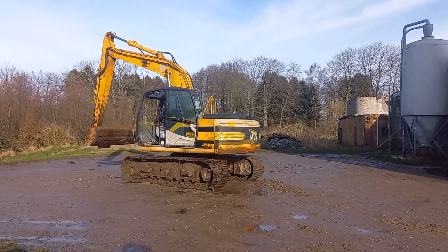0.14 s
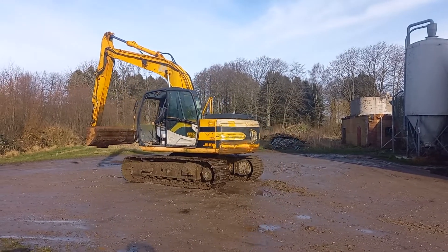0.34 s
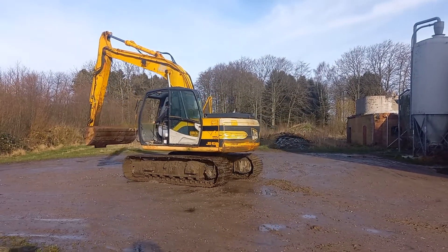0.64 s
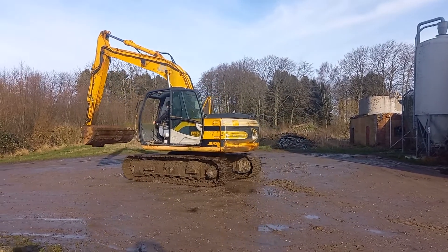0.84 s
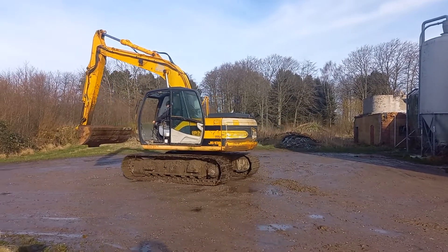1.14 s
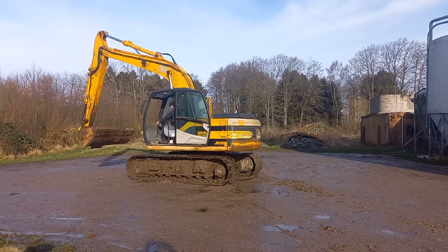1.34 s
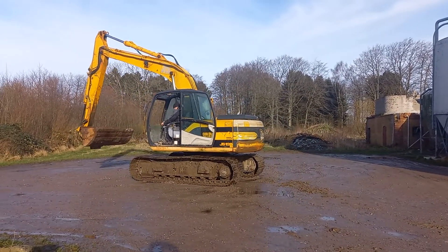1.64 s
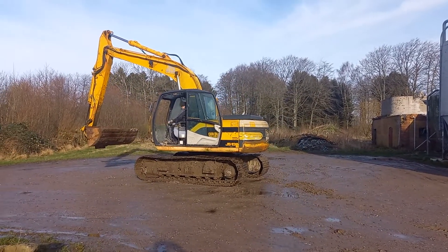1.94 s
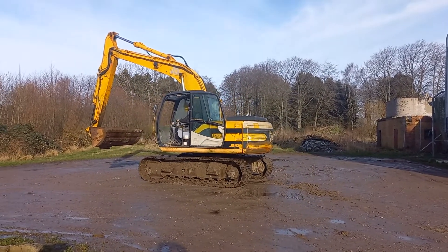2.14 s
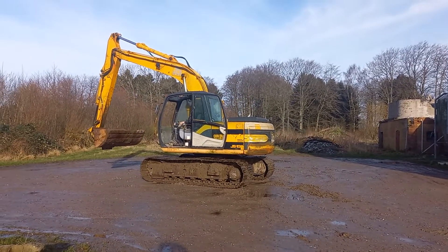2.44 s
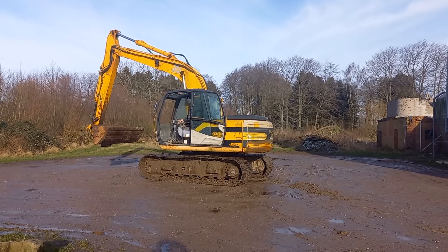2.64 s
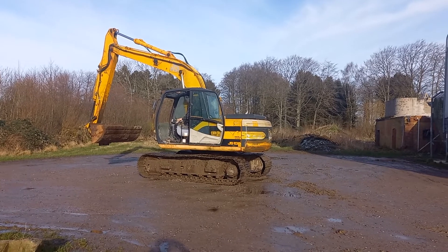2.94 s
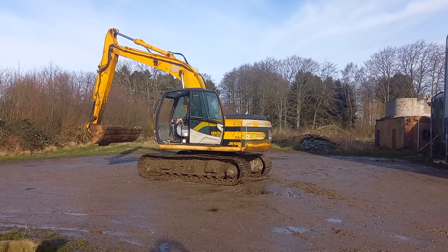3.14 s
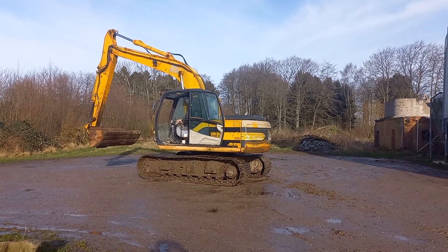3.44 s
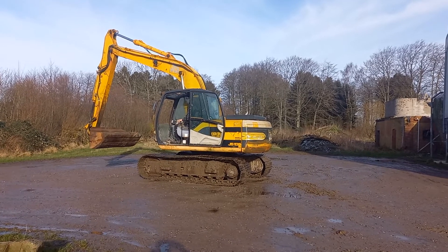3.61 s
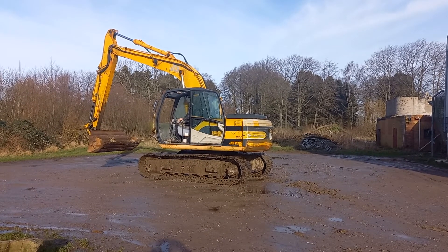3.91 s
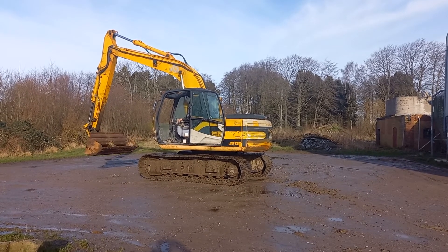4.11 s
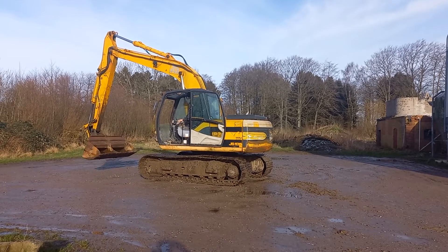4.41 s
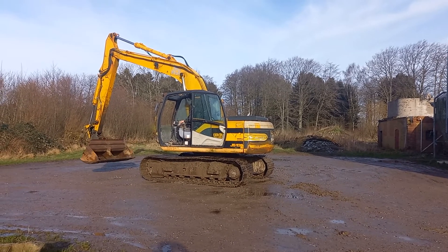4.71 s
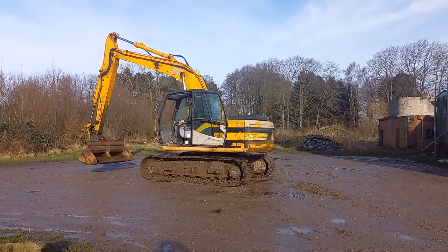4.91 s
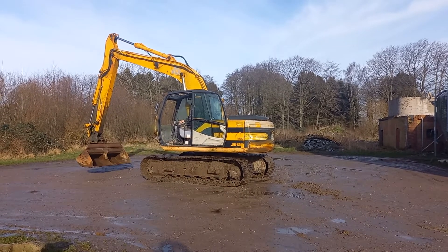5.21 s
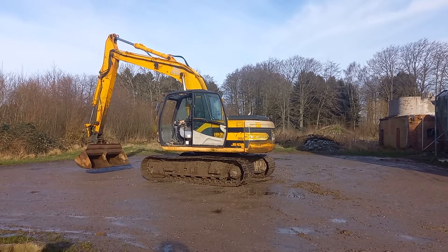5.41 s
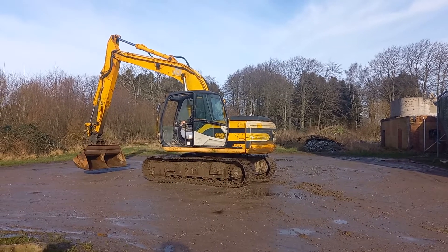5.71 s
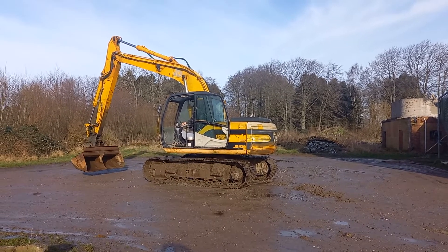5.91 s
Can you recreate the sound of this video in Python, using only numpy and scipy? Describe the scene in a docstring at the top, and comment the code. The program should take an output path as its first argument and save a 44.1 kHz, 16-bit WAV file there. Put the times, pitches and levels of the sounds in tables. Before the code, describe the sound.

Steel tracks clank, grind and groan to a stop, leaving a clattering diesel engine that deepens with pump whine as the digging arm moves.

```python
"""Excavator in a muddy yard

The stereo microphones stand some ten metres off a tracked excavator, its four-cylinder turbo diesel at governed speed.
At first it skids round on its tracks: random jerks and clicks ring the steel, and gliding tones squeal over wet grit.
The tracks stop and the engine runs light; then the hydraulics load it again to move arm and bucket.
Sines locked to the shaft make the exhaust boom and pump whine, pulsed noise the clatter, a wavering tone the turbo."""
import sys
import numpy as np
from scipy import signal
from scipy.fft import rfft, irfft, next_fast_len
from scipy.io import wavfile
from scipy.ndimage import map_coordinates

SR = 44100
rng = np.random.default_rng(int(sys.argv[2]) if len(sys.argv) > 2 else 0)


def digitize_waveform(pressure):
    """Quantize a signal to 16-bit integers and store it at the path in sys.argv[1].

    Rows of a 2-D input are taken as channels; values are limited to [-1, 1].
    """
    field = np.atleast_2d(pressure).T
    bounded = np.clip(field, -1, 1)
    quanta = np.round(bounded * 32767).astype(np.int16)
    wavfile.write(sys.argv[1], SR, quanta)


N = 267246


# Engine, fan and gear tones: (multiple of shaft rate, level running light [dB], level under load [dB])
SHAFT_TONES = [(3, -57, -44.5), (3.5, -56, -53), (5, -58, -55), (5.5, -41, -44), (6, -42, -37),
               (6.5, -55, -51), (7, -54, -48), (8, -59, -43), (12, -59, -54), (14, -45, -47),
               (16, -45.5, -47.3), (18.5, -52, -53), (19, -57, -51), (19.5, -49.5, -57), (20, -61, -50.5),
               (20.5, -57, -51), (25, -63, -57), (31.5, -60, -55), (36, -58, -53), (38, -66, -50.5),
               (41.5, -66, -55), (42.5, -63, -50), (45, -62, -54)]
# Thin covers that sing when a tone slides through them: (pitch [Hz], width [Hz], boost [dB])
SINGING_PANELS = [(502, 9, 7), (579, 28, 10)]


def tones(turns, load, firing_hz, boom_db, drone_db, pump_db, octave_db, whine_db):
    """Shaft harmonics: exhaust at 2 and 4 times the shaft rate, the pump at 9, 18 and 63, fan and gears."""
    levels = {order: light + load * (loaded - light) for order, light, loaded in SHAFT_TONES}
    levels[4], levels[9], levels[18], levels[63] = drone_db, pump_db, octave_db, whine_db
    # firings are less even when little fuel goes in
    uneven_db = (0.76 - 0.5 * load) * walk(40)
    out = undb(boom_db + uneven_db) * np.sin(2 * np.pi * 2 * turns)
    for order, level_db in levels.items():
        tone_hz = order * firing_hz / 2
        ring_db = sum(boost / (1 + (2 * (tone_hz - hz) / width) ** 2) for hz, width, boost in SINGING_PANELS)
        waver_db = 1.2 * walk(14)
        flutter = (0.04 + 0.004 * order) * walk(40)  # phase [rad]
        phase = 2 * np.pi * (order * turns + rng.random()) + flutter
        out = out + undb(level_db + ring_db + waver_db) * np.sin(phase)
    out = np.sqrt(2) * out  # sine levels become rms levels
    # a late echo off the sheds widens the tones a little
    side = undb(-20) * np.roll(out, 780)
    return np.array([out + side, out - side])


# Colour of the exhaust gas: (frequency [Hz], relative level [dB per Hz])
GAS_COLOUR = [(20, -28), (45, -6), (75, -2), (125, 4), (175, -1), (240, -0.5), (300, -4), (420, -6.5),
              (700, -40.5)]
# Colour of the engine block: (frequency [Hz], relative level [dB per Hz])
BLOCK_COLOUR = [(250, -31), (420, -8), (530, 2), (680, 0.5), (830, -4), (980, -1.5), (1150, -2), (1450, -4),
                (1700, -5), (1950, -6.5), (2250, -6.5), (2750, -7.5), (3100, -19), (5000, -62)]
# Colour of the injector ticks: (frequency [Hz], relative level [dB per Hz])
INJECTOR_COLOUR = [(2000, -42), (3100, -2), (4050, -3), (4600, 1), (5250, 2), (5650, -5), (6100, -6),
                   (6650, -17.5), (7200, -8.5), (8000, -10), (8800, -15.5), (10300, -15.5), (11200, -20),
                   (12100, -16.5), (13300, -21), (15700, -24)]


def clatter(turns, load, repeat=0.46, knock_depth=0.041, gas_depth=0.51):
    """Each firing puffs gas, knocks the block and ticks an injector; valves and gears rattle alike every two turns."""
    pattern = rng.standard_normal((2, 2400))
    place = (turns / 2 % 1) * pattern.shape[1]
    valves = np.array([map_coordinates(p, [place], order=1, mode="wrap") for p in pattern])
    rattle = repeat * unit(valves) + np.sqrt(1 - repeat ** 2) * noise()

    firings = 2 * turns
    strength_db = 0.7 * rng.standard_normal(1024)[firings.astype(int)]  # one draw per firing
    block = radiate(rattle * gate(firings, knock_depth) * undb(strength_db), BLOCK_COLOUR)
    tick_depth = 0.04 + 0.12 * load
    hiss_and_clicks = noise() + 0.42 * grains(4000, 1.4)
    ticks = radiate(hiss_and_clicks * gate(firings, tick_depth) * undb(0.89 * strength_db), INJECTOR_COLOUR)
    gas = radiate(noise() * gate(firings, gas_depth), GAS_COLOUR)

    block = block * undb(-36 + 2.57 * load)
    ticks = ticks * undb(-47.0 + 3.02 * load + 0.58 * walk(30))
    gas = gas * undb(-38.5 + 2.44 * load)
    return block + ticks + gas


def gate(cycles, depth):
    """A rounded swell in each cycle, from a sine and its octave; rms 1."""
    swell = np.sin(2 * np.pi * cycles) + np.sin(4 * np.pi * cycles) / 4
    return unit(1 + depth * swell)


# Hollow silencer resonance that beats against the drone; its level running light and rise under load
HOLLOW_HZ, HOLLOW_WIDTH_HZ = 150.5, 2.2
HOLLOW_DB, HOLLOW_RISE_DB = -44.5, 3.5
# Loose covers buzzing: base level running light, rise under load, spread of the fits, fits a second
BUZZ_DB, BUZZ_RISE_DB, BUZZ_SPREAD_DB, BUZZ_RATE = -55, 4, 4, 22
# Pitches at which loose covers buzz: (pitch [Hz], level relative to the base [dB])
LOOSE_COVERS = [(1110, 1.5), (1245, 2.5), (1335, -3), (1490, -0.5), (1650, -1), (1740, 1.5), (2220, -7)]


def resonances(load, stray_hz=16):
    """The engine sets the silencer humming and makes loose covers buzz in short, wavering fits."""
    hollow_db = HOLLOW_DB + HOLLOW_RISE_DB * load + 1.5 * walk(5)
    out = waver(HOLLOW_HZ, HOLLOW_WIDTH_HZ, 12) * undb(hollow_db)
    for hz, relative_db in LOOSE_COVERS:
        fits_db = BUZZ_SPREAD_DB * np.minimum(walk(BUZZ_RATE), 2)
        buzz = waver(hz, stray_hz, 60) * undb(BUZZ_DB + relative_db + BUZZ_RISE_DB * load + fits_db)
        sides = 1 + 0.21 * rng.standard_normal() * np.array([1, -1])  # each cover sits off centre
        out = out + np.outer(sides, buzz)
    return out


# Hydraulic moves, each taking over from the last: tracks driven, eased, all valves shut, arm lifting,
# a hard shove, two stages of arm lowering and bucket, easing. Columns:
# (start [s], glide [s], load [1 = normal work], silencer drone [dB], nine-piston pump tone [dB],
#  its octave [dB], its high whine [dB])
VALVE_MOVES = [(-1, .5, 1.2, -32.5, -42, -43, -70), (1.2, .3, .34, -41, -47, -47, -70),
               (1.6, .3, 0, -38.5, -58, -58, -70), (2.42, .4, .4, -35, -53, -56, -70),
               (3.06, .28, .97, -31.5, -40, -48, -66), (3.63, .08, 1.42, -33, -42, -43, -64),
               (3.74, .09, 1.14, -32.2, -40.7, -40.5, -64), (5.22, .17, 1.35, -29.7, -47, -47, -49.5),
               (5.55, .4, 1.17, -29.7, -50, -48, -53)]


def hydraulics():
    """Load and the four tone levels glide to each move's own values as its valve opens."""
    state = np.outer(VALVE_MOVES[0][2:], np.ones(N))
    for start_s, glide_s, *working in VALVE_MOVES[1:]:
        target = np.array(working)[:, None]
        state = state + (target - state) * ramp(start_s, glide_s)
    return state


# Steel tracks: when they stand still, how long they brake
STOP_S, BRAKE_S = 1.796, 0.37
# Shoes a second over the sprocket, the moment one bites, the surge it gives
SHOE_RATE, SHOE_BITE_S, SURGE_DB = 2.87, 0.35, 0.5
# Levels of shaking frames, scraping shoes and crushed grit, before surge, jerks and braking
RUMBLE_DB, SCRAPE_DB, GRIT_DB = -28, -25.5, -40.5
# Groan of the braked tracks: when it sets in, how long it rises, its level before jerks and braking
GROAN_S, GROAN_RISE_S, GROAN_DB = 1.106, 0.29, -29
# Colour of the track frames: (frequency [Hz], relative level [dB per Hz])
FRAME_COLOUR = [(25, -43), (55, 7), (110, 10), (175, -2.5), (245, 15), (300, 11), (380, 6), (600, -38)]
# Colour of the scraping shoes: (frequency [Hz], relative level [dB per Hz])
SHOE_COLOUR = [(250, -21.5), (420, -2.5), (620, 0.5), (900, -0.5), (1080, -6), (1300, -8.5), (1580, -6.5),
               (1950, -13.5), (2200, -12), (2700, -21.5), (3100, -30), (5000, -50)]
# Colour of the crushed grit: (frequency [Hz], relative level [dB per Hz])
GRIT_COLOUR = [(2000, -5), (3500, -0.5), (4050, -2.5), (4500, 3), (5200, 0), (5800, -5), (6650, -10.5),
               (7300, -4.5), (8000, -6.5), (8800, -16.5), (10300, -11), (12200, -11), (13200, -17),
               (15500, -12)]
# Colour of the braking groan: (frequency [Hz], relative level [dB per Hz])
GROAN_COLOUR = [(200, -45), (420, 1.5), (560, -3), (750, -6), (1000, -30), (2500, -80)]


def tracks(rumble_power=0.24, scrape_power=0.72, grit_power=0.9):
    """Shoes stick and slip on grit: uneven jerks and a surge per shoe drive frames, shoes and crushed stones.
    Each sound follows a power of track speed, so under braking the grit falls fastest and the rumble slowest."""
    speed = 1 - ramp(STOP_S - BRAKE_S, BRAKE_S)
    t = np.arange(N) / SR
    surge_db = SURGE_DB * np.cos(2 * np.pi * SHOE_RATE * (t - SHOE_BITE_S))
    jerks = walk(60.5)
    stones = noise() + 0.7 * grains(2500, 3.2)
    frames = radiate(grains(4000, 1.2), FRAME_COLOUR) * undb(RUMBLE_DB + surge_db + 0.72 * jerks)
    shoes = radiate(grains(6000, 1.4), SHOE_COLOUR) * undb(SCRAPE_DB + surge_db + jerks)
    grit = radiate(stones, GRIT_COLOUR) * undb(GRIT_DB + 0.5 * jerks)
    groan = radiate(grains(3000, 1.6), GROAN_COLOUR) * undb(GROAN_DB + jerks) * ramp(GROAN_S, GROAN_RISE_S)
    return frames * speed ** rumble_power + (shoes + groan) * speed ** scrape_power + grit * speed ** grit_power


# A shoe squealing briefly over stone:
# (time [s], length [s], level before chatter [dB], first pitch [Hz], last pitch [Hz])
SHOE_SQUEALS = [(0.039, 0.025, -26.5, 1620, 1573), (0.105, 0.068, -27, 1600, 1535),
                (0.214, .03, -30, 1500, 1610), (0.306, 0.069, -25, 1040, 792),
                (0.385, 0.074, -22.5, 980, 607), (.548, 0.022, -25.5, 950, 930),
                (0.668, 0.024, -23, 870, 910), (0.753, 0.035, -29, 750, 803), (0.822, 0.044, -28, 960, 880),
                (1.041, 0.065, -28, 740, 854), (1.293, 0.055, -29.5, 1580, 1377)]


def squeals(rough=0.0816, chatter_db=3):
    """A slipping shoe sings for a moment, chattering over the grit, its rough pitch sliding as the slip changes."""
    out = np.zeros(N)
    for start_s, length_s, level_db, first_hz, last_hz in SHOE_SQUEALS:
        along = ramp(start_s, length_s)
        hz = first_hz + (last_hz - first_hz) * along
        swell = np.sqrt(4 * along * (1 - along))
        out += undb(level_db) * swell * waver(hz, rough * hz, 700)
    return out * unit(undb(chatter_db * walk(200)))


# Dull knocks of the settling tracks and the arm's pins: (time [s], level relative to the common trim [dB])
JOINT_KNOCKS = [(.008, -14), (.122, -14.5), (.261, -15), (.294, -16.5), (.369, -13), (0.428, -13),
                (.456, -16), (.71, -15), (.979, -16), (1.057, -18), (1.148, -16.5), (1.23, -17),
                (1.33, -15.5), (1.634, -14.5), (1.657, -16), (1.711, -17), (1.816, -23), (1.936, -23),
                (2.311, -23), (3.037, -21.5), (3.311, -23), (3.758, -27), (4.123, -26), (5.45, -26)]
# What the steel frame rings with: (mean pitch [Hz], relative level [dB], 60 dB decay [s])
STEEL_MODES = [(251, -5.5, 0.14), (282.2, -0.5, 0.14), (324.4, 0.5, 0.11), (370, -6.5, 0.061),
               (487, -6, 0.064)]
# Stones cracking and small clinks:
# (time [s], peak level [dB], lower edge [Hz], upper edge [Hz], decay constant [s])
STONE_CRACKS = [(.143, -35, 5500, 9000, .004), (.256, -35, 5500, 9500, .006),
                (.584, -32, 5000, 11000, .005), (1.378, -30, 4500, 13000, .005),
                (1.578, -35, 6000, 15000, .014), (1.603, -36, 5500, 12500, .005),
                (1.887, -40, 7000, 14000, .005), (1.919, -39, 7000, 15000, .004),
                (2.056, -41, 10000, 14000, .004), (3.698, -39, 5500, 9000, .004),
                (3.855, -42, 7000, 15000, .006), (5.822, -35, 4500, 9500, .006)]
# Track shoes slipping with a scrape or a clack:
# (time [s], peak level [dB], lower edge [Hz], upper edge [Hz], decay constant [s])
SHOE_CLACKS = [(.305, -13.5, 600, 1170, 0.052), (.443, -17, 523, 890, .02), (.765, -17, 560, 950, 0.02),
               (1.078, -17, 500, 1100, 0.033), (1.35, -25, 1510, 2400, 0.023),
               (1.428, -9.5, 450, 2100, .006), (1.583, -19.5, 450, 2390, .018), (1.68, -25, 430, 1400, .02),
               (1.749, -24, 420, 654, 0.016), (1.82, -24.5, 480, 700, .025)]


def blows(knock_trim_db=-1, contact_s=0.0028):
    """Slack steel joints ring the frame's modes; shoes clack and stones crack as decaying bands of noise."""
    out = np.zeros((2, N + SR))
    t = np.arange(SR // 4) / SR
    for start_s, level_db in JOINT_KNOCKS:
        ring = np.zeros(len(t))
        for hz, mode_db, t60 in STEEL_MODES:
            struck_hz = hz * (1 + 0.026 * rng.standard_normal())
            decay = np.exp(-np.log(1000) * t / t60)
            ring += undb(mode_db) * decay * np.sin(2 * np.pi * struck_hz * t)
        ring = ring * (1 - np.exp(-t / contact_s))  # mud softens the contact
        first = int(start_s * SR)
        out[:, first:first + len(t)] += undb(level_db + knock_trim_db) * ring / abs(ring).max()
    for start_s, peak_db, low_hz, high_hz, decay_s in list(STONE_CRACKS) + list(SHOE_CLACKS):
        band = signal.butter(3, [low_hz, high_hz], "band", fs=SR, output="sos")
        burst = rng.standard_normal((2, len(t))) * np.exp(-t / decay_s)
        mid, side = signal.sosfilt(band, burst)
        pair = mid + np.outer([0.35, -0.35], side)
        first = int(start_s * SR)
        out[:, first:first + len(t)] += undb(peak_db) * pair / abs(mid).max()
    return out[:, :N]


# Turbocharger whistle: (time [s], mean pitch [Hz], level [dB])
TURBO_WHISTLE = [(0, 15700, -70), (1.8, 15350, -67), (2.2, 14950, -65), (2.6, 14700, -66), (3, 14480, -64),
                 (3.3, 14720, -63), (3.55, 15050, -59.5), (3.7, 15320, -61.5), (4, 15600, -68),
                 (6.06, 15700, -73)]


def turbo():
    """A thin, breathy blade whistle, sinking while the engine runs light and climbing as the pumps draw power."""
    hz, level_db = curves(TURBO_WHISTLE)
    return undb(level_db) * np.array([waver(hz, 160, 650) for _ in range(2)])


# Ringing steel covers: (pitch [Hz], width [Hz], boost [dB])
RINGING_COVERS = [(1230, 41, 2), (1560, 75, 2), (1690, 37, 4), (2197, 59, 4), (3470, 27, 6.5),
                  (3810, 47, 4.5)]
# Width at the microphones: (frequency [Hz], side minus mid [dB])
STEREO_WIDTH = [(70, -47), (250, -10), (600, -14), (1200, -7), (2200, -7), (3300, 3), (5000, -7),
                (6700, 1.5), (8500, -3), (12000, 2.5)]
# Lean at the microphones: (frequency [Hz], left minus right [dB])
STEREO_LEAN = [(600, 0.5), (1500, 2), (2700, 1.5), (3700, -3.5), (4900, -4.5), (6400, 4), (7500, -2.5),
               (10200, 5), (11700, -2), (14000, 1)]


def radiate(pair, points):
    """Two unrelated excitations ring one many-panelled body: one comes straight, one scattered round the yard."""
    gain = response(points)
    hz = np.linspace(0, SR / 2, len(gain))
    modes = rng.standard_normal(256)
    small_db = 1.1 * np.interp(hz, 2400 + 80 * np.arange(len(modes)), modes, left=0)
    covers_db = sum(boost / (1 + (2 * (hz - f) / width) ** 2) for f, width, boost in RINGING_COVERS)
    direct, scattered = unit(colour(pair, gain * undb(small_db + covers_db)))
    side = colour(scattered, response(STEREO_WIDTH))
    lean = np.sqrt(response(STEREO_LEAN))  # half the lean on each channel
    return np.array([colour(direct + side, lean), colour(direct - side, 1 / lean)])


def undb(db):
    """Decibels to gain."""
    return 10 ** (np.asarray(db) / 20)


def unit(x):
    """Scale to rms 1."""
    return x / np.sqrt(np.mean(x ** 2))


def curves(table):
    """Each column of a timed table, sample by sample."""
    s, *columns = np.transpose(table)
    return [np.interp(np.arange(N) / SR, s, c) for c in columns]


def response(points):
    """Frequency and decibel points joined on a log axis, as a gain for each frequency bin."""
    hz, db = np.transpose(points)
    bins = np.linspace(0, SR / 2, next_fast_len(N, True) // 2 + 1)
    return undb(np.interp(np.log(bins + 1), np.log(hz), db))


def colour(x, gain):
    """Filter by a gain for each frequency bin."""
    size = next_fast_len(N, True)
    return irfft(rfft(x, size) * gain, size)[..., :N]


def noise():
    """Two unrelated white noises."""
    return rng.standard_normal((2, N))


def walk(rate):
    """Smooth chance with rms 1 that changes about rate times a second."""
    steps = rng.standard_normal(4096)
    return unit(map_coordinates(steps, [np.arange(N) / SR * rate], order=1, mode="wrap"))


def grains(rate, spread_db):
    """Dense random clicks, a few much larger than the rest; rms 1."""
    hit = rng.random((2, N)) < rate / SR
    size_db = spread_db * np.minimum(rng.exponential(size=(2, N)), 5)
    return unit(hit * noise() * undb(size_db))


def waver(hz, width_hz, rate):
    """A tone of rms 1 whose pitch strays by chance."""
    cycles = np.cumsum(hz + width_hz * walk(rate)) / SR
    return np.sqrt(2) * np.sin(2 * np.pi * (cycles + rng.random()))


def ramp(start_s, length_s):
    """A straight rise from 0 to 1."""
    return np.clip((np.arange(N) / SR - start_s) / length_s, 0, 1)


def lag(x, settle_s):
    """Follow a control with inertia, starting at rest on its first value."""
    keep = np.exp(-1 / (settle_s * SR))
    return x[0] + signal.lfilter([1 - keep], [1, -keep], x - x[0])


# Governor: settling time, extra fuel per Hz of sudden sag in firing rate
GOVERNOR_S, FUEL_PER_HZ = 0.27, 0.092
# Exhaust boom at the firing rate: level without fuel demand, rise per unit of fuel
BOOM_IDLE_DB, BOOM_RISE_DB = -32.5, 9
# Beyond this much fuel the clatter and gear tones grow no louder
CLATTER_FULL_FUEL = 0.67
# Engine speed, which sags as the hydraulics draw power: (time [s], firing rate [Hz])
ENGINE_SPEED = [(0, 68.3), (.21, 69.1), (.33, 67.6), (.45, 69.1), (.7, 68.3), (1.22, 68.4), (1.48, 72.9),
                (1.65, 72.2), (1.77, 73.65), (3.06, 73.6), (3.24, 71.8), (3.63, 71.3), (3.71, 69.1),
                (3.82, 70.8), (4.05, 70.45), (5.18, 70.3), (5.38, 69.1), (6.06, 70.3)]


def scene():
    """Hydraulic load and the governor set the fuel, which drives boom and clatter; the tracks add their own noise."""
    firing_hz, = curves(ENGINE_SPEED)
    turns = np.cumsum(firing_hz / 2) / SR  # four cylinders fire twice a turn
    demand, drone_db, pump_db, octave_db, whine_db = hydraulics()
    sag_hz = np.maximum(lag(firing_hz, GOVERNOR_S) - firing_hz, 0)
    fuel = demand + FUEL_PER_HZ * sag_hz
    load = np.clip(fuel / CLATTER_FULL_FUEL, 0, 1)
    boom_db = BOOM_IDLE_DB + BOOM_RISE_DB * fuel
    engine = tones(turns, load, firing_hz, boom_db, drone_db, pump_db, octave_db, whine_db)
    engine = engine + clatter(turns, load) + resonances(load)
    return engine + tracks() + squeals() + blows() + turbo()


def record(dry):
    """Behind the microphones a steep low-pass filter cuts the top."""
    top_hz = 15750
    return signal.sosfilt(signal.ellip(14, 0.2, 80, top_hz, fs=SR, output="sos"), dry)


dry = scene()
out = record(dry)
digitize_waveform(out)
```